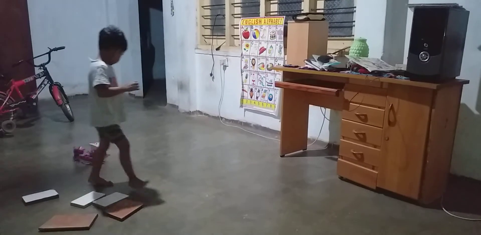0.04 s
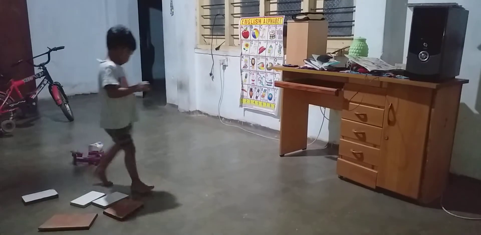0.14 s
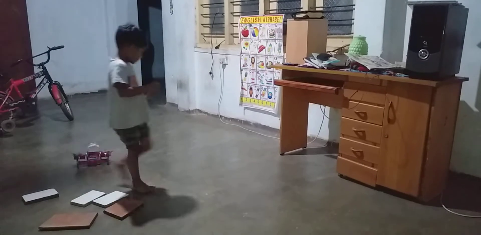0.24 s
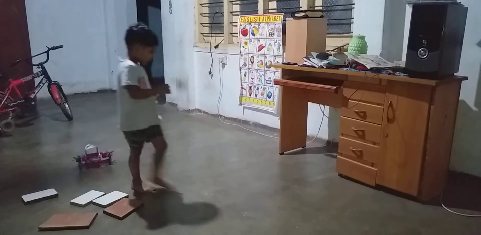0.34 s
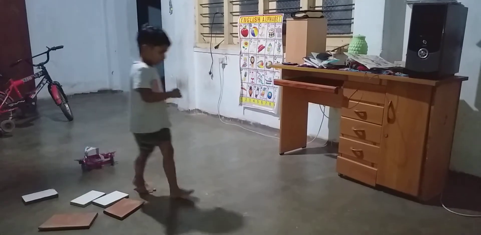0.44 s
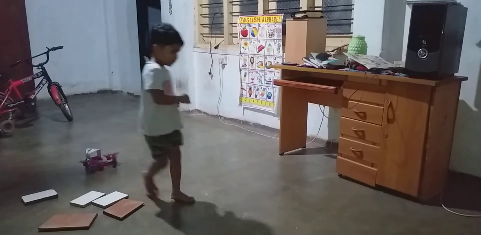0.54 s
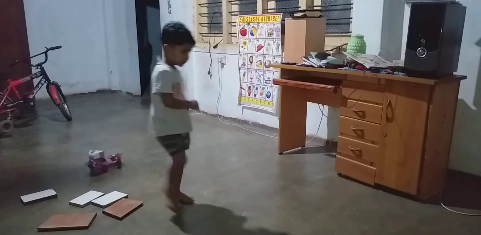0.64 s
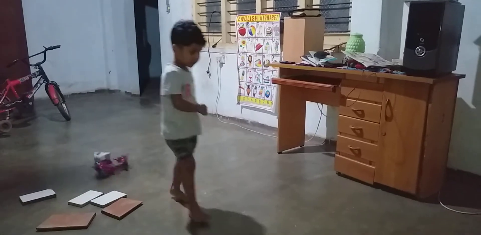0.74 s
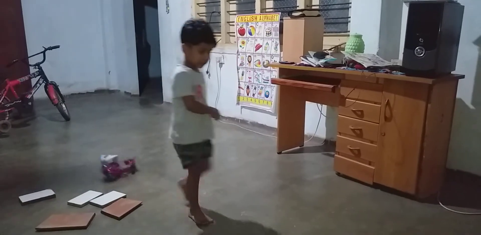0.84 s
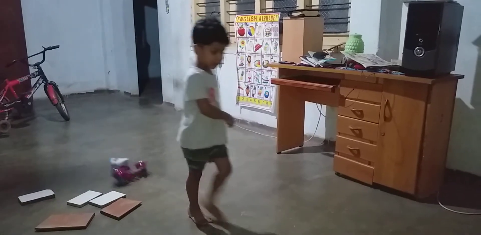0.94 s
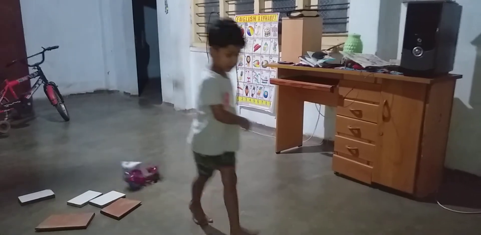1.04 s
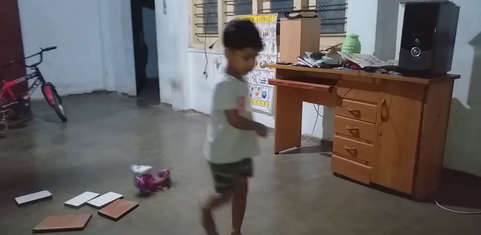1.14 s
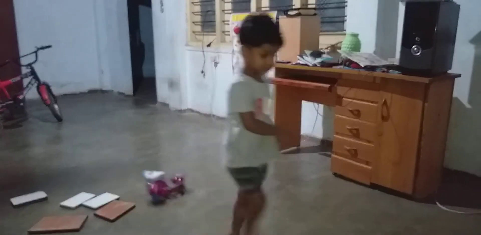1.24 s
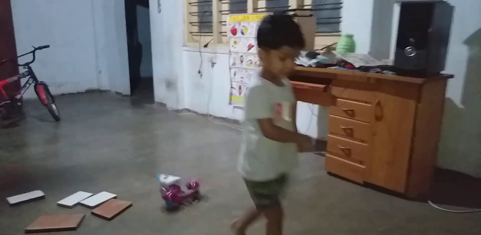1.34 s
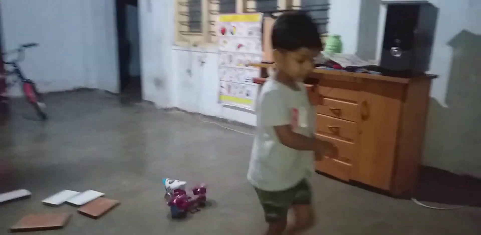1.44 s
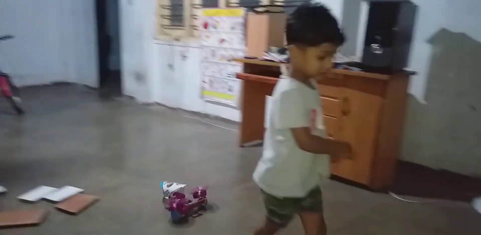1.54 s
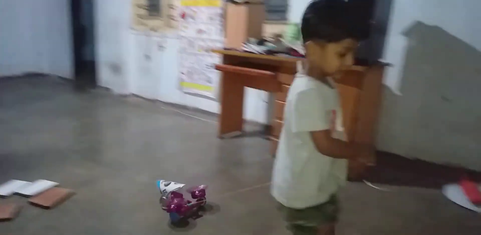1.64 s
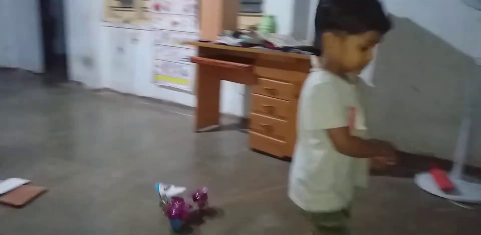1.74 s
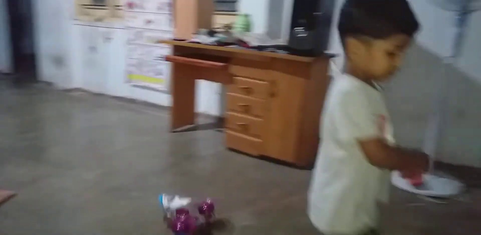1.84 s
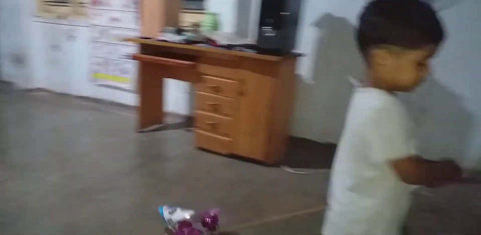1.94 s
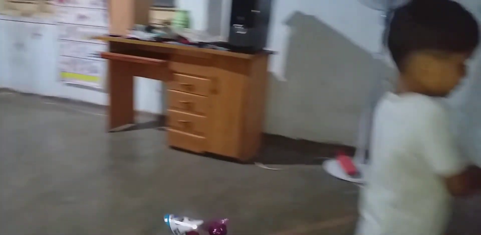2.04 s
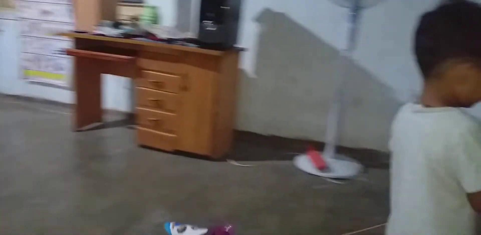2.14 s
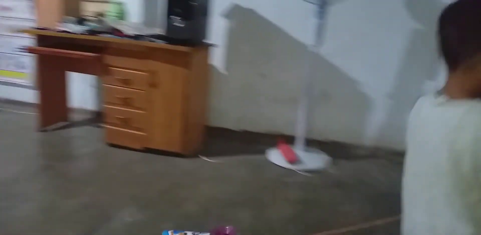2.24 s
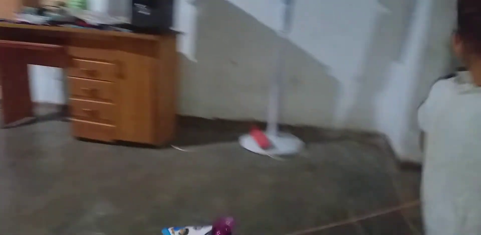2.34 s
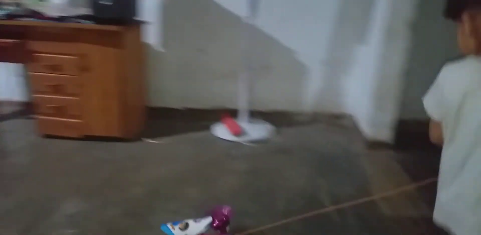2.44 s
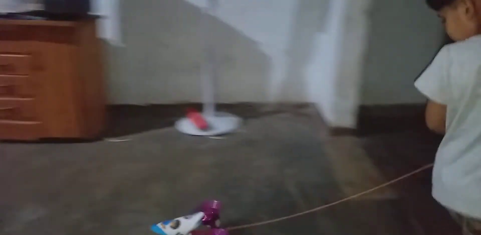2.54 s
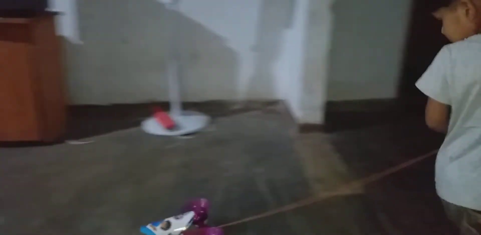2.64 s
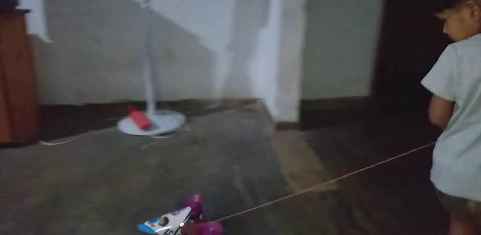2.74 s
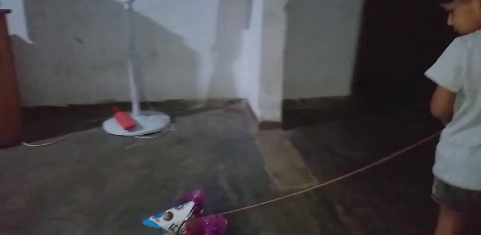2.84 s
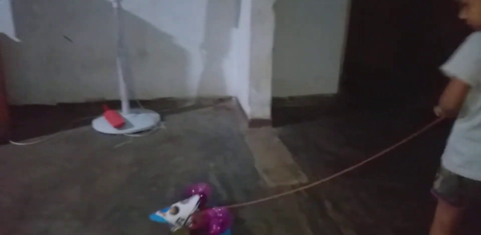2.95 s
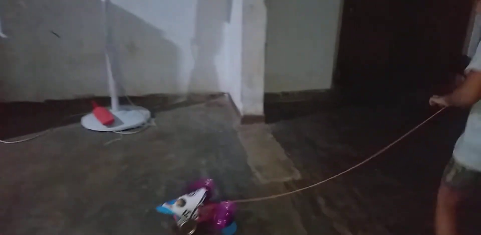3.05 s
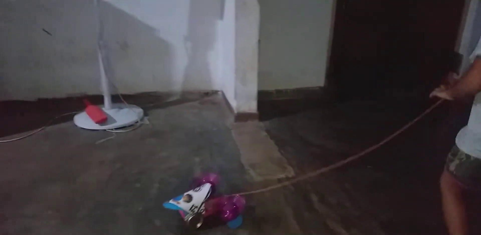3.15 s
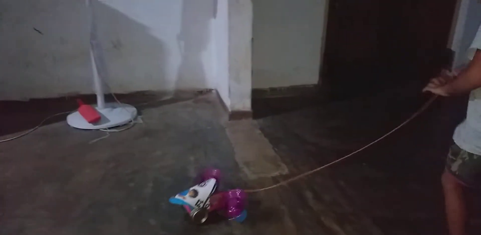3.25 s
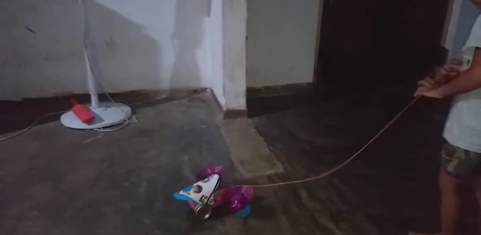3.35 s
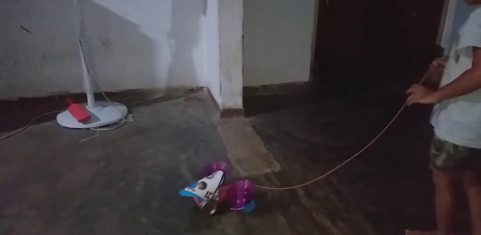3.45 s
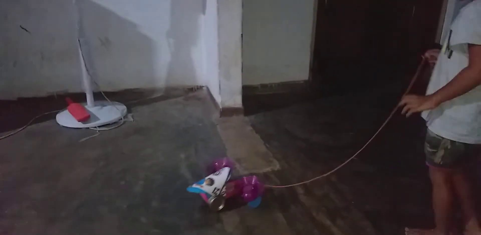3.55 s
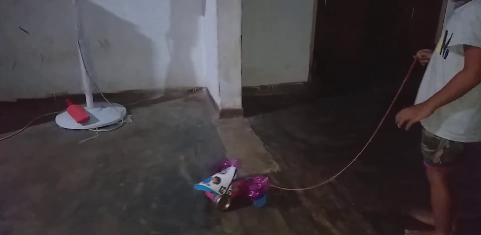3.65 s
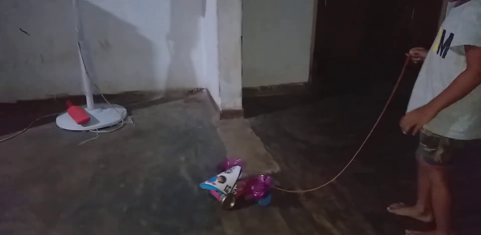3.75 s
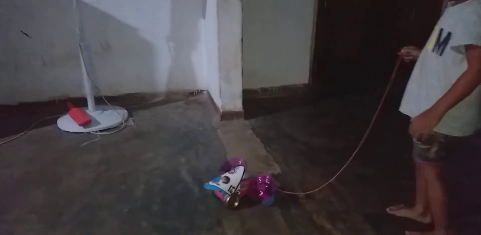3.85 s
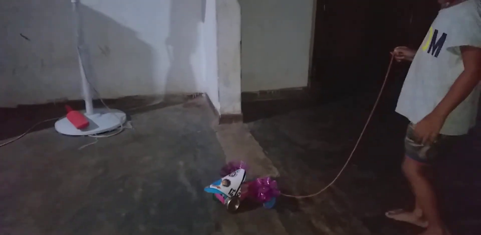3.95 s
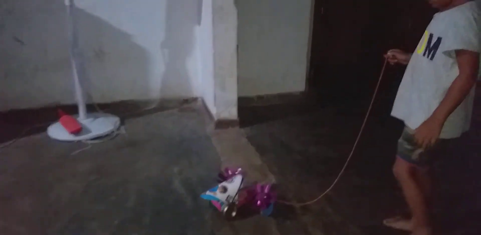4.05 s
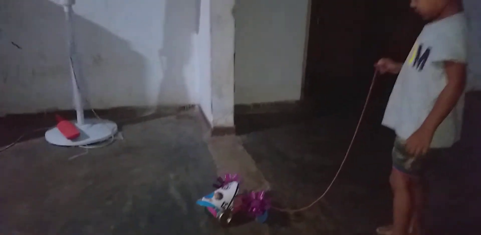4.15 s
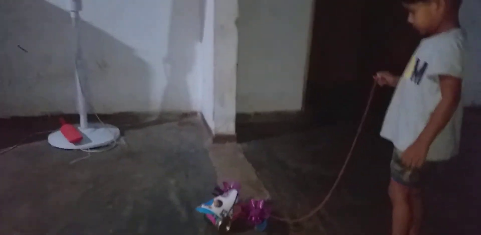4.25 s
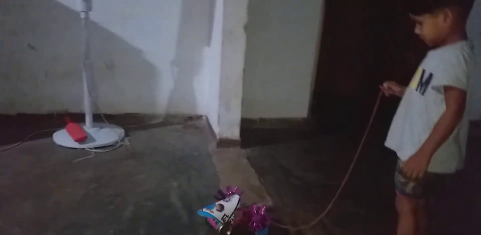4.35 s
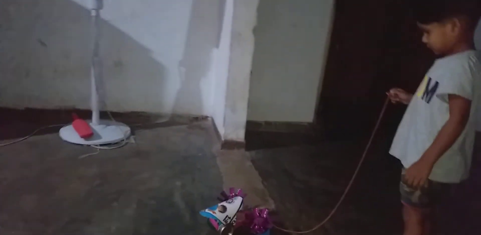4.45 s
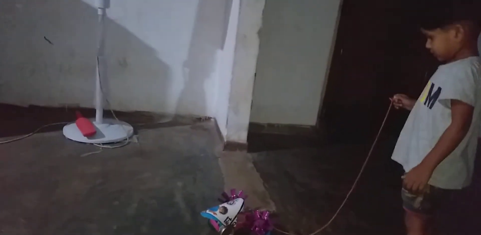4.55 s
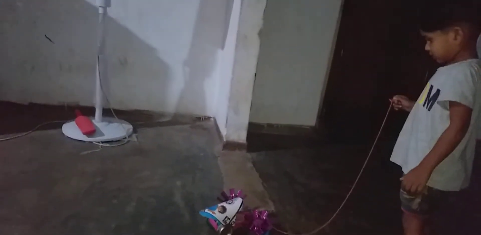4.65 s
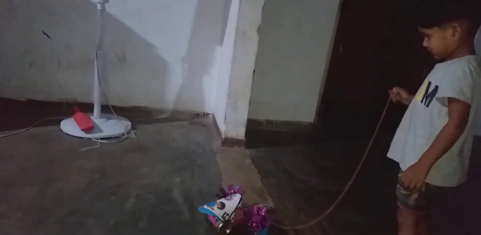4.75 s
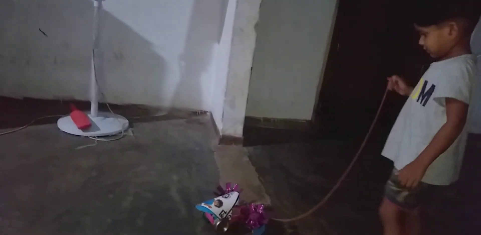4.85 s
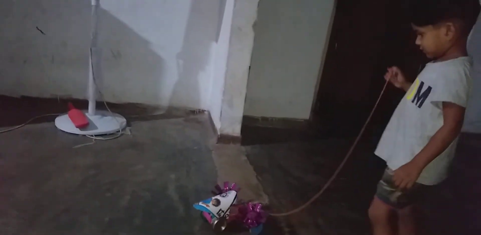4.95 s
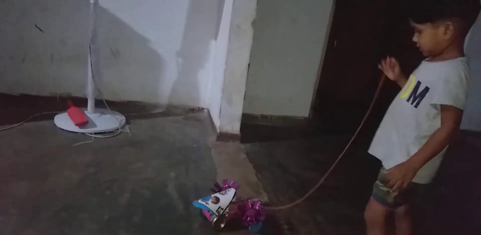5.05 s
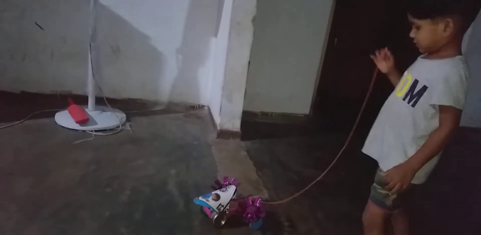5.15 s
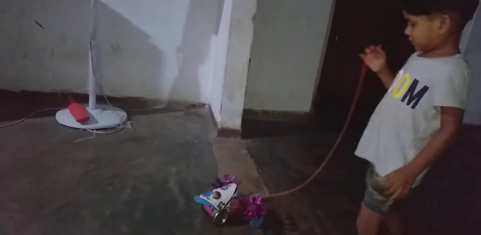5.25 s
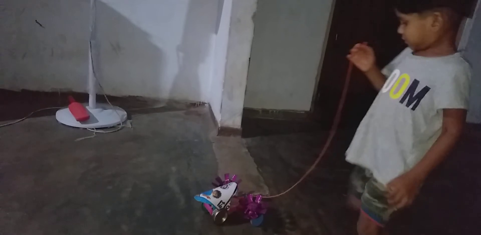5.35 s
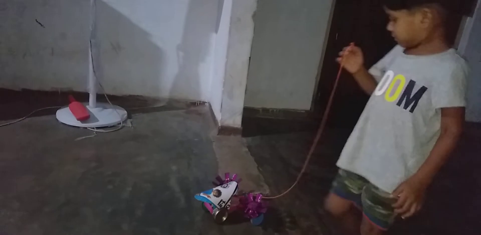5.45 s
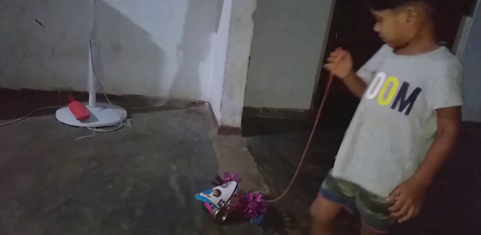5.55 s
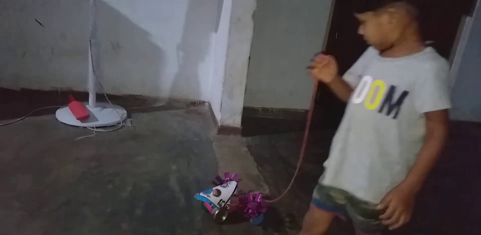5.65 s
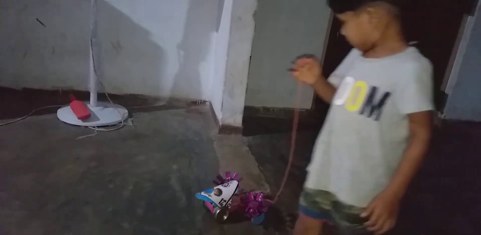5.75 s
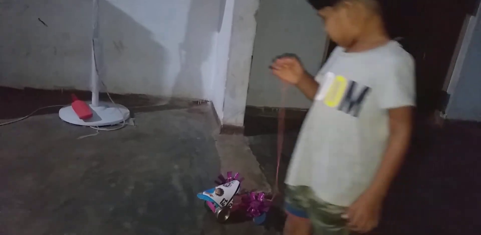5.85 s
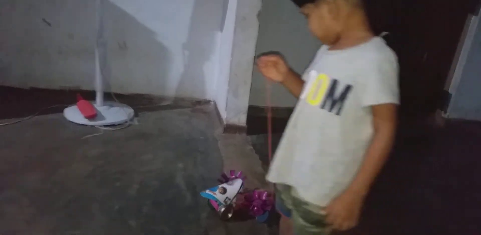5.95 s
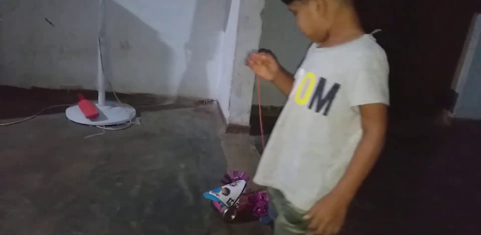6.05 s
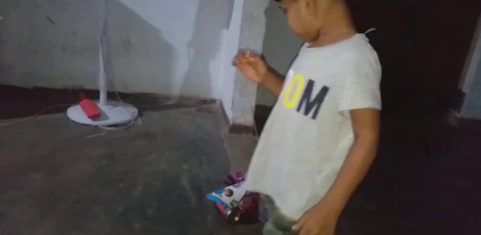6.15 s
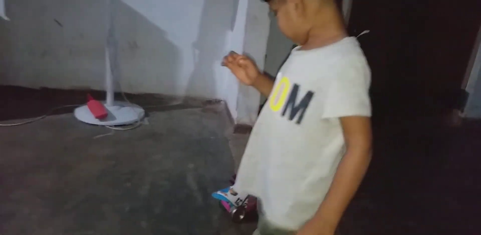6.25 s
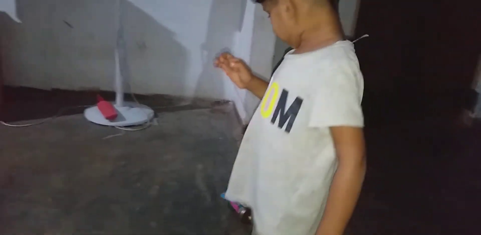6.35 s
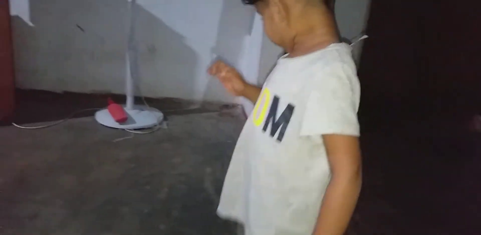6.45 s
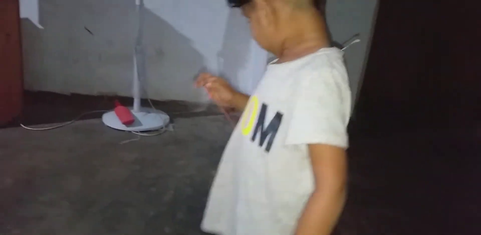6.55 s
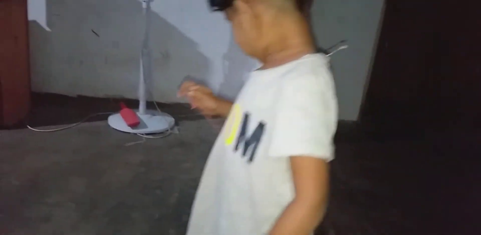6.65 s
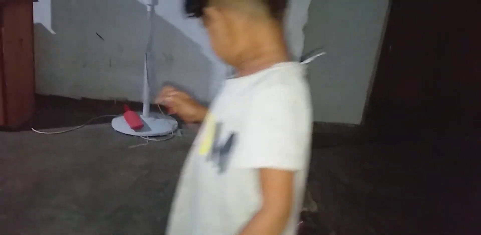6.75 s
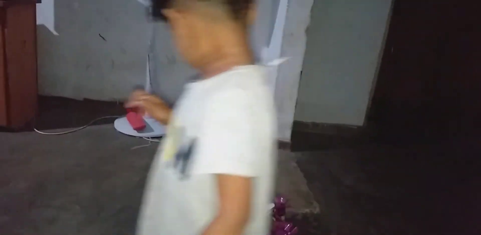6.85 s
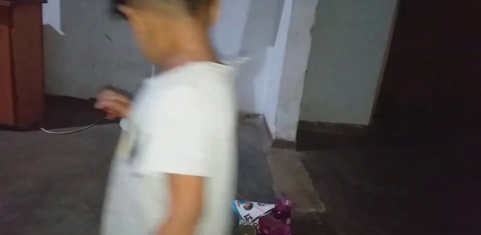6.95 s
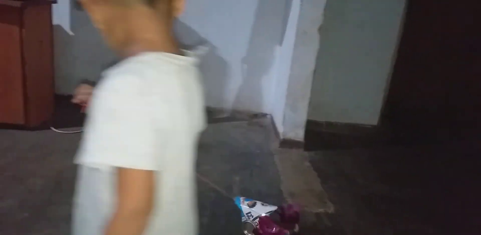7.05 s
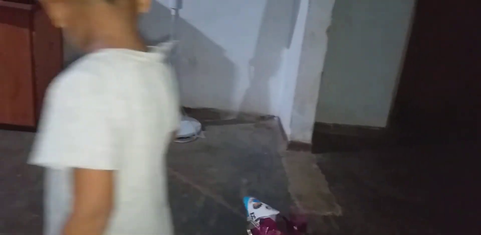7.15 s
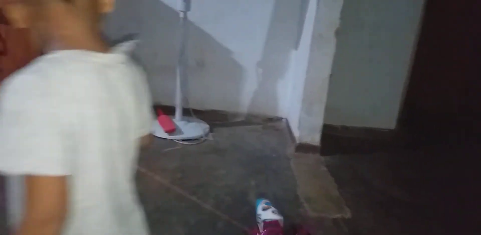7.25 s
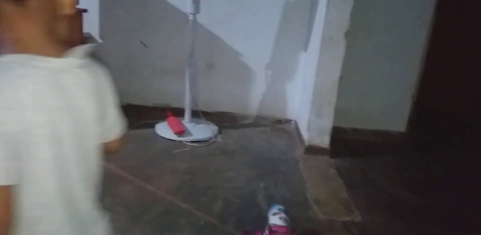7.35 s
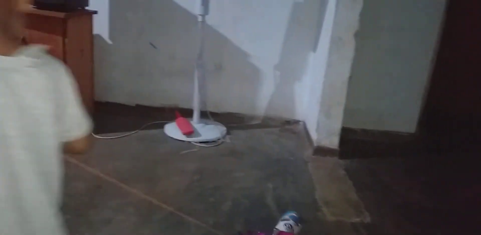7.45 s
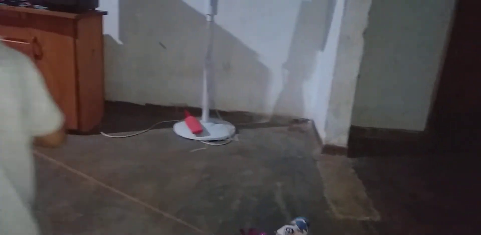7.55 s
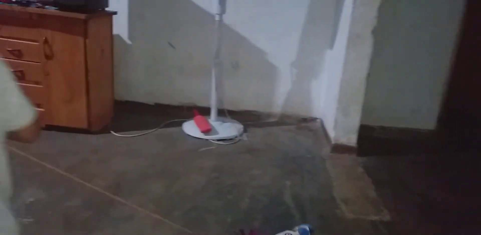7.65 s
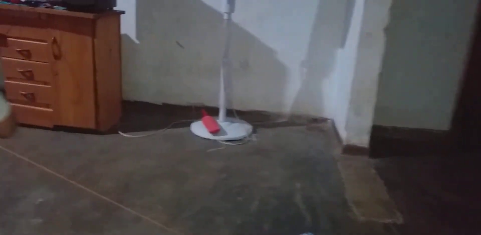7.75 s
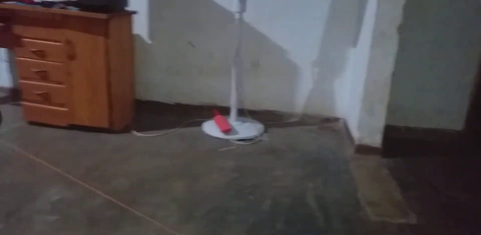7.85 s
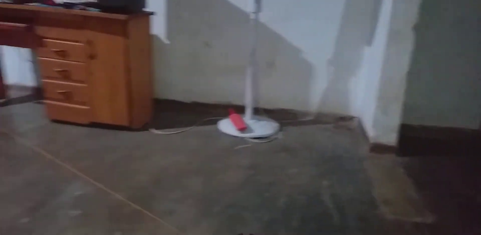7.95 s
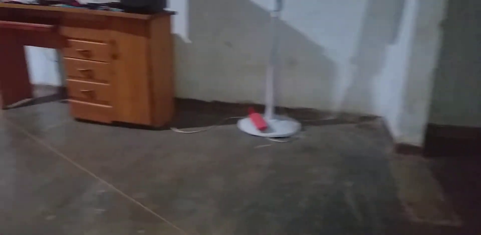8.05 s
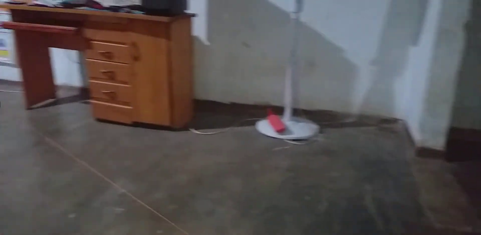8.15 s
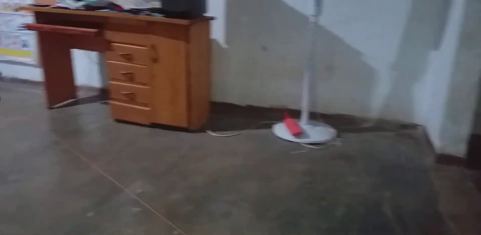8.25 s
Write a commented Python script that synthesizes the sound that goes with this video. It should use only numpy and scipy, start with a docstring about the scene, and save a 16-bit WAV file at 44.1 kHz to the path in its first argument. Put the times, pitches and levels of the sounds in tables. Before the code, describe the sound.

A plastic toy car towed on a string grinds over concrete in a bare, echoing room. Its hollow clacks quicken into a dense rattle with whirring axles, then thin out as it slows and stops. A quiet rest leaves room hiss, electric hum, faint rustles and a thin insect-like trill. A sharp wheel scrape follows and the clacking roll resumes. Handheld phone microphone, fairly close.

```python
"""Hard wheels grind over concrete and a clacker knocks on a hollow plastic toy car towed on a string.
The wheels are dense random impacts; each knock is a run of contacts filtered by the resonant body.
The knocks blur into a rattle at speed and thin out as the car slows, in a bare, echoing room.
The car rests for a moment, leaving an electric hum and a faint insect-like trill of wavering tones.
Then a few scrapes of the wheels are heard and the car rolls on."""
import sys
import numpy as np
from scipy import signal
from scipy.fft import rfft, irfft
from scipy.io import wavfile
from scipy.ndimage import uniform_filter1d, minimum_filter1d

SR = 44100
rng = np.random.default_rng(int(sys.argv[2]) if len(sys.argv) > 2 else 0)


def log_audio(samples):
    """Write samples as a 16-bit WAV file to the path given in sys.argv[1]."""
    # one column per channel
    frames = np.atleast_2d(samples).T
    # limit to full scale, then quantise
    limited = np.clip(frames, -1, 1)
    pcm = np.round(limited * 32767).astype(np.int16)
    wavfile.write(sys.argv[1], SR, pcm)


N = 366030
T = np.arange(N) / SR

# Resonances of the hollow body. Each row: frequency in Hz, width in Hz, lift in dB.
BODY_MODES = [(1538.5, 95, 12.5), (1606, 110, 9.5), (1833, 119, 16.5), (1909, 170, 8), (2210, 100, 12.5),
              (2517, 32, 7.5), (2830, 51, 4), (3044, 200, 6.5), (3650, 66, 0.5), (3755, 240, 7.5),
              (5030, 110, 2), (6615, 240, 10.5), (11900, 190, 6), (15070, 295, 5.5)]
# Broad spectrum of the knocks and ticks, as the microphone picks them up.
# Each row: frequency in Hz, level in dB.
KNOCK_SPECTRUM = [(60, -46), (180, -32.5), (320, -17.5), (500, -14.5), (800, -8), (1150, -8), (1500, 1.5),
                  (4300, 1), (5400, 0.5), (6200, -4.5), (7800, -4.5), (9100, -20.5), (10200, -8),
                  (15500, -8)]
# Loudness of wheels and loose parts with the nearness of the car. Each row: time in seconds, gain in dB.
NEARNESS_GAIN = [(0, 1), (1.8, -4), (2.03, 1.5), (2.25, 0.5), (3.3, 2), (7.0, 0.5), (8.3, 1)]


def undb(db):
    """Amplitude ratio: 20 dB is a factor of ten."""
    return 10 ** (np.asarray(db) / 20)


def unit(x):
    """Power normalisation: scale to rms 1."""
    return x / np.sqrt(np.mean(x ** 2))


def unit_energy(x):
    """Energy normalisation: scale the sum of squares to 1."""
    return x / np.sqrt(np.sum(x ** 2))


def curve(rows):
    """Linear interpolation in time of rows (s, value)."""
    return np.interp(T, *np.transpose(rows))


def along(points, f):
    """Interpolation of rows (Hz, value) on a logarithmic frequency axis."""
    hz, value = np.transpose(points)
    return np.interp(np.log(f + 1), np.log(hz), value)


def colour(x, points, peaks=()):
    """Minimum-phase filtering: a smooth spectrum with optional resonances, made causal by its cepstrum."""
    size = 4096
    f = np.fft.rfftfreq(size, 1 / SR)
    db = along(points, f)
    for hz, width, lift in peaks:
        db = db + lift / (1 + (2 * (f - hz) / width) ** 2)
    cepstrum = irfft(np.log(undb(db)))
    # folding the negative times onto the positive ones gives minimum phase
    cepstrum[1:size // 2] *= 2
    cepstrum[size // 2 + 1:] = 0
    response = irfft(np.exp(rfft(cepstrum)))
    return signal.fftconvolve(x, response)[:len(x)]


def high_pass(x, hz):
    """Second-order Butterworth high-pass: attenuates what lies below hz."""
    return signal.sosfilt(signal.butter(2, hz, "high", fs=SR, output="sos"), x)


def band_pass(x, low_hz, high_hz):
    """Butterworth band-pass: keeps what lies between two frequencies."""
    return signal.sosfilt(signal.butter(2, [low_hz, high_hz], "band", fs=SR, output="sos"), x)


def walk(rate):
    """Low-passed randomness: about `rate` random values per second, joined smoothly, at rms 1."""
    k = int(SR / rate)
    steps = np.repeat(rng.standard_normal(N // k + 1), k)
    return unit(uniform_filter1d(steps, k)[:N])


def swells(rows):
    """Gaussian envelopes: a sum of bells (centre s, standard deviation s, peak dB)."""
    return sum(undb(db) * np.exp(-((T - s) / length) ** 2 / 2) for s, length, db in rows)


def grit(rate, spread_db):
    """Shot noise: random impacts of uneven size, on average `rate` per second."""
    hit = rng.random(N) < rate / SR
    sign = rng.choice([-1, 1], N)
    size = undb(spread_db * np.minimum(rng.exponential(size=N), 4))
    return unit(hit * sign * size)


def contacts(gap_s, length_s, spread_db):
    """Repeated impact: a run of quick, uneven rebounds that dies away."""
    delays = np.cumsum(gap_s * (.3 + 1.4 * rng.random(size=80)))
    sizes = rng.choice([-1, 1], len(delays)) * undb(spread_db * rng.standard_normal(len(delays)))
    sizes = sizes * np.exp(-(delays / length_s) ** 2)
    return unit_energy(np.bincount((delays * SR).astype(int), sizes, SR // 5)[:SR // 5])


def rough_tone(hz, width_hz):
    """A rubbed resonance: two carriers in quadrature, modulated at random in size and phase."""
    phase = 2 * np.pi * np.cumsum(hz * np.ones(N)) / SR
    return unit(walk(width_hz) * np.sin(phase) + walk(width_hz) * np.cos(phase))


def background(waver_db=1.0, trill_hz=3335, between_db=-79, count=6):
    """Stationary noise and modulated tones: room noise, a wavering electric hum and a thin, distant trill."""
    # Steady room noise. Each row: frequency in Hz, level in dB.
    noise_spectrum = [(25, -29.5), (48, -20), (63, 1.5), (85, -4), (150, -3.5), (280, -10), (780, -17),
                      (950, -22.5), (1800, -19.5), (2800, -29.5), (3500, -24.5), (4400, -29.5), (5100, -25),
                      (5900, -29), (6700, -22.5), (7900, -20), (9800, -22.5), (11000, -44), (16000, -34.5)]
    # Narrow bands in the room noise. Each row: frequency in Hz, width in Hz, lift in dB.
    noise_bands = [(5150, 300, 6.5), (7780, 150, 3.5), (8200, 97, 7.5)]
    # Tones of the hum. Each row: frequency in Hz, level in dB before the swell.
    hum_tones = [(199.2, -63), (242.2, -71.5), (500.6, -71)]
    # Slight swell of noise and hum. Each row: time in seconds, gain in dB.
    swell_gain = [(4.5, -1.5), (5.2, 2), (7.2, 3), (8.3, -1)]
    noise_db = -59.5  # before the swell
    first_s, every_s, length_s = 4.39, .378, .09
    first_db, growth_db = -66.5, .5  # level of the first call, and gain from each to the next

    hiss = undb(noise_db) * unit(colour(rng.standard_normal(N), noise_spectrum, noise_bands))
    hum = 0
    for hz, db in hum_tones:
        tone = unit(np.sin(2 * np.pi * hz * T + .4 * walk(8)))
        hum = hum + undb(db + waver_db * walk(6.3)) * tone
    trill = rough_tone(trill_hz, 230)
    calls = swells([(first_s + k * every_s, length_s, first_db + k * growth_db) for k in range(count)])
    return undb(curve(swell_gain)) * (hiss + hum) + (calls + undb(between_db)) * trill


def feet(width_hz=55):
    """Friction and low-frequency impact: soft shuffles and dull bumps as band-limited noise bursts."""
    # Soft shuffling on the floor. Each row: centre in seconds, spread in seconds, level in dB.
    shuffle_times = [(5.24, 0.093, -61)]
    # Spectrum of the shuffling. Each row: frequency in Hz, level in dB.
    shuffle_spectrum = [(300, -29), (800, -11), (1100, -16), (1850, 1), (2800, -14), (8000, -30)]
    # Dull bumps and low rumbles. Each row: centre in seconds, spread in seconds, level in dB, pitch in Hz.
    bump_rows = [(0.514, 0.049, -49, 376), (0.797, 0.073, -53, 282), (0.914, 0.12, -51, 203),
                 (1.898, 0.031, -52.5, 313), (2.23, 0.044, -51, 299), (3.2, 0.31, -57.5, 312),
                 (5.048, 0.15, -64, 340.6), (6.7, 0.21, -61, 334.6)]

    out = swells(shuffle_times) * unit(colour(rng.standard_normal(N), shuffle_spectrum))
    for *row, hz in bump_rows:
        thud = band_pass(rng.standard_normal(N), hz - width_hz / 2, hz + width_hz / 2)
        out += swells([row]) * unit(thud)
    return out


def scuffs(squeak_hz=5500):
    """Sliding friction: wheels scrape as the string tugs; string and cloth rustle and squeak faintly."""
    # Wheels scuffing sideways. Each row: centre in seconds, spread in seconds, level in dB.
    scrape_times = [(6.4, 0.026, -53), (6.475, .016, -42.5), (6.524, 0.018, -28.5), (6.57, 0.024, -35)]
    # Spectrum of the scrape. Each row: frequency in Hz, level in dB.
    scrape_spectrum = [(300, -26.5), (600, -19), (830, -7), (1400, -16), (2100, 3), (2800, -14), (3850, 0),
                       (4400, -8), (5120, 2), (6300, -9), (7100, -0.5), (9000, -16.5), (11500, -9),
                       (15500, -15)]
    # Resonances of the scuffing wheels. Each row: frequency in Hz, width in Hz, lift in dB.
    scrape_modes = [(3850, 130, 9), (5080, 140, 10)]
    # The faint squeak. Each row: centre in seconds, spread in seconds, level in dB.
    squeak_times = [(5.6, .1, -68)]
    # Faint rustles of string and cloth. Each row: centre in seconds, spread in seconds, level in dB.
    rustle_times = [(4.03, 0.1, -49.5), (4.86, 0.031, -60), (5.15, 0.076, -60.5), (5.42, 0.025, -64.5),
                    (5.57, 0.022, -60), (5.87, .05, -63.5)]
    # Spectrum of the rustles. Each row: frequency in Hz, level in dB.
    rustle_spectrum = [(300, -10), (2500, -7), (5000, 2), (9000, -7), (15500, -10.5)]

    scrape = swells(scrape_times) * unit(colour(grit(2500, spread_db=-2.5), scrape_spectrum, scrape_modes))
    squeak = swells(squeak_times) * rough_tone(squeak_hz, 600)
    rustle = swells(rustle_times) * unit(colour(grit(1500, spread_db=2.5), rustle_spectrum))
    return scrape + squeak + rustle


def speed(ease_s=0.056, full_turns_per_s=24):
    """Kinematics: the car's speed as a share of full speed, its changes smoothed over a short time."""
    # Speed counted in turns of the clacker cam. Each row: time in seconds, turns per second.
    cam_turns = [(0, 6), (.3, 7.5), (1.06, 19.5), (1.35, 23.5), (2.0, 26.5), (2.25, 21), (2.65, 14.5),
                 (3.0, 7.5), (3.4, 6), (3.78, 0), (6.42, 0), (6.72, 4.5), (7.1, 6.5), (7.45, 7), (8.3, 13)]
    eased = uniform_filter1d(curve(cam_turns), int(ease_s * SR))
    return np.maximum(eased, 0) / full_turns_per_s


def wheels(grit_db=0.5, whirr_waver_db=2.0):
    """Rolling noise: roughness impacts shake the chassis; axles whirr by friction once fast enough."""
    # Spectrum of the rolling wheels. Each row: frequency in Hz, level in dB.
    rolling_spectrum = [(60, -48.5), (200, -24.5), (350, -16), (550, -14.5), (850, -8.5), (1300, 1),
                        (2000, 4), (2600, -1.5), (5000, -2.5), (6500, -7.5), (8000, -8.5), (9100, -19),
                        (10200, -9), (16000, -10)]
    # Resonances of wheels and chassis. Each row: frequency in Hz, width in Hz, lift in dB.
    chassis_modes = [(308, 46, 4.5), (809, 170, 8), (1970, 282, 4.5), (5210, 280, 6), (7180, 410, 5.5),
                     (14370, 630, -3.5)]
    # Whirrs of the dry axles. Each row: nominal pitch in Hz, width in Hz, relative level in dB.
    axle_whirrs = [(2026, 550, -4.5), (5430, 420, -7), (14200, 900, -13)]
    roll_db = -21  # at full speed, before nearness and judder
    whirr_db, whirr_speed, whirr_glide = -34, .25, .05  # level, share of full speed, rise of pitch
    judder_db = 1.2  # rms

    grind = undb(roll_db) * speed() * unit(colour(grit(2000, grit_db), rolling_spectrum, chassis_modes))
    sing = np.tanh((speed() / whirr_speed) ** 2)
    pitch = 1 + whirr_glide * (sing - .75) + .01 * walk(7)
    whirr = 0
    for hz, width, db in axle_whirrs:
        whirr = whirr + undb(db + whirr_waver_db * walk(25)) * rough_tone(hz * pitch, width)
    return (grind + undb(whirr_db) * sing * whirr) * undb(curve(NEARNESS_GAIN) + judder_db * walk(70))


def strike(slack):
    """Contact mechanics: the soft striker wakes low modes; slack delays, hardens and bounces the knock."""
    flam_db, rebound_db, loose_db = -9, -19, 20  # loose_db: added to the rebounds at full slack
    lag_s, low_hz, high_hz, hard_hz = .006, 1400, 2600, 1100  # lag_s and hard_hz: at full slack
    knock = undb(flam_db) * contacts(gap_s=.0012, length_s=.006, spread_db=0)
    knock += undb(rebound_db + loose_db * slack) * contacts(gap_s=.004, length_s=.032, spread_db=3)
    knock[0] += 1
    late = np.roll(knock, int(lag_s * slack * SR))
    return band_pass(late, low_hz, high_hz + hard_hz * slack)


def pawl_rasp(slack, build_s=0.00631, thin_hz=450):
    """Stick-slip: the pawl rasps in a run of contacts, which builds up gradually when slack is small."""
    rasp = high_pass(contacts(gap_s=.0014, length_s=.029, spread_db=1.5), thin_hz)
    return rasp * (1 - np.clip(.7 - slack, 0, 1) * np.exp(-T[:len(rasp)] / build_s))


def blow(knock_db, rasp_db, slack, snap_db=-13.0, slack_snap_db=6):
    """Modal excitation: the pawl snaps free and rasps, and the striker knocks on the resonant body."""
    detune, scatter_db = .003, .6  # random spread of mode frequency (share) and of lift
    panel_top_hz, pawl_share = 2400, .5  # the light pawl lifts the modes below this only by this share
    knock, rasp = strike(slack), pawl_rasp(slack)
    snap = band_pass(contacts(gap_s=.0003, length_s=.002, spread_db=3), 3600, 10500)
    # every blow lands on a slightly different spot and favours other modes
    body = [(hz * (1 + detune * rng.standard_normal()), width, db + scatter_db * rng.standard_normal())
            for hz, width, db in BODY_MODES]
    light = [(hz, width, db * (pawl_share if hz < panel_top_hz else 1)) for hz, width, db in body]
    parts = [(knock, body, knock_db), (rasp, light, rasp_db),
             (snap, light, rasp_db + snap_db + slack_snap_db * slack)]
    return sum(undb(db) * unit_energy(colour(part, KNOCK_SPECTRUM, modes)) for part, modes, db in parts)


def clacker(gain_db=19.5, lead_s=.0005, thin_hz=2600):
    """Impact-driven resonance: the striker hits the hollow body; gear teeth and loose parts tick at speed."""
    # Clacks, merging into a flutter at speed. Each row: time in seconds, relative level of the knock in dB.
    clack_rows = [(0.3339, 3), (0.4738, -2.5), (0.6042, -3), (0.7095, 1), (0.7698, -3.5), (0.835, -3),
                  (0.9002, -3.5), (0.967, 0.5), (1.0124, -4.5), (1.0613, -4), (1.109, -9), (1.1686, -3),
                  (1.2042, -7), (1.254, -7), (1.297, -6), (1.335, -18), (1.3692, -6), (1.41, -6),
                  (1.452, -7.5), (1.4974, -11), (1.5303, -7.5), (1.577, -4.5), (1.6207, -2.5), (1.669, -14),
                  (1.7068, -2), (1.7426, -6.5), (1.7854, -11), (1.8268, -10), (1.873, -8.5), (1.915, -5.5),
                  (1.955, -11), (1.9913, -9), (2.0319, -10.5), (2.106, -7), (2.1477, -3), (2.2129, -14.5),
                  (2.256, -7), (2.306, -10.5), (2.364, -14), (2.4107, -15), (2.459, -11.5), (2.5202, -8.5),
                  (2.5808, -8), (2.6605, -6), (2.76, -11.5), (2.834, -10), (2.933, -7), (3.051, -18),
                  (3.2048, -5.5), (3.3254, -5.5), (3.473, -4.5), (3.682, -10.5), (7.464, -0.5), (7.591, -2),
                  (7.707, -3), (7.8291, -1), (7.9488, -4), (8.037, -3.5), (8.1297, -4), (8.2283, -5.5)]
    # Slack in the drive, which delays and spreads the knock. Each row: time in seconds, slack from 0 to 1.
    slack_rows = [(2.1, 0.03), (2.5, 0.59), (3.2, 1), (7.5, 0.7), (8.2, 0.5)]
    # Strength of the pawl's rasp. Each row: time in seconds, relative level in dB.
    rasp_rows = [(.33, -1), (0.599, -6), (.8, -4.5), (1.149, -8), (1.7, -6), (2.03, -7.5), (2.2, -9),
                 (2.75, -7), (3.2, -6), (3.7, -5.5), (7.46, 0.05), (8.3, -4)]
    rattle_db, rattle_power = -19.5, 2.2  # at full speed before nearness, and growth with speed

    out = np.zeros(N + SR)
    for s, db in clack_rows:
        slack = np.interp(s, *np.transpose(slack_rows))
        rasp_db = np.interp(s, *np.transpose(rasp_rows))
        sound = undb(gain_db) * blow(db, rasp_db, slack)
        start = int((s - lead_s) * SR)  # the panel takes a moment to swing up
        out[start:start + len(sound)] += sound
    ticks = high_pass(grit(380, spread_db=2.5), thin_hz)
    rattle = speed() ** rattle_power * unit(colour(ticks, KNOCK_SPECTRUM, BODY_MODES))
    return out[:N] + undb(rattle_db + curve(NEARNESS_GAIN)) * rattle


def room_tail(early_db=2, early_s=0.062, first_wall_s=.007):
    """Reverberant decay: noise with strong early reflections and a tail that dulls as it fades."""
    # The room's ring. Each row: frequency in Hz, reverberation time (60 dB decay) in seconds.
    decay_times = [(200, 0.49), (800, 1), (2000, 1), (5000, 0.98), (8000, 0.88), (15000, 0.57)]
    t = T[:SR]
    f, when, cells = signal.stft(rng.standard_normal(len(t)), SR, nperseg=256)
    fading = cells * undb(-60 * when / along(decay_times, f)[:, None])
    tail = signal.istft(fading, SR)[1][:len(t)]
    return unit_energy(tail * (t > first_wall_s) * (1 + undb(early_db) * np.exp(-t / early_s)))


def room(x, direct_db=-2.0, wet_db=-3.0, count=48):
    """Convolution reverberation: overlapping slices each get a fresh reflection pattern and crossfade."""
    hop = N // count + 1
    padded = np.pad(x, (hop, 2 * hop))
    wet = np.zeros(N + 3 * hop + 2 * SR)
    fade = np.sin(np.pi * np.arange(2 * hop) / (2 * hop))
    for start in hop * np.arange(count + 1):
        echo = signal.fftconvolve(fade * padded[start:start + 2 * hop], room_tail())
        wet[start:start + len(echo)] += echo
    return undb(direct_db) * x + undb(wet_db) * wet[hop:hop + N]


def limit(x, ceiling=0.89, hold_s=0.0012):
    """Peak limiting: turn the gain down smoothly around any peak above the ceiling."""
    k = int(hold_s * SR)
    gain = ceiling / np.maximum(abs(x), ceiling)
    return x * uniform_filter1d(minimum_filter1d(gain, 2 * k + 1), k)


def scene():
    """Superposition: the reverberant toy and feet over the quiet background."""
    return (room(clacker() + wheels() + scuffs() + feet()) + background())[None]


def record(dry, bass_hz=50, top_hz=15750):
    """Band limitation: the phone limits the highest peaks, drops the deep bass and cuts the top."""
    thin = signal.sosfilt(signal.butter(4, bass_hz, "high", fs=SR, output="sos"), limit(dry))
    return signal.sosfilt(signal.ellip(12, .2, 90, top_hz, fs=SR, output="sos"), thin)


dry = scene()
out = record(dry)
log_audio(out)
```